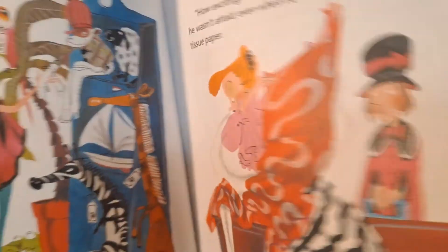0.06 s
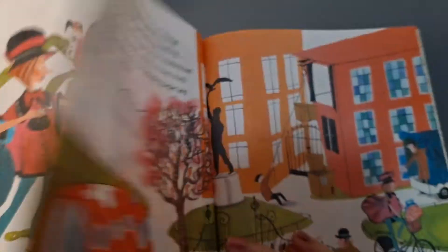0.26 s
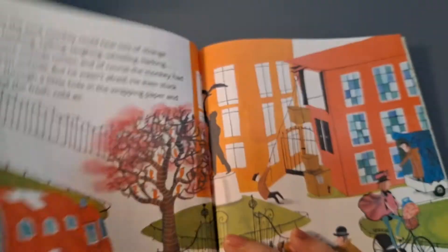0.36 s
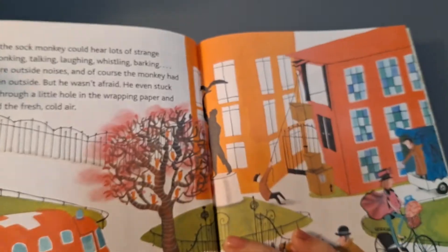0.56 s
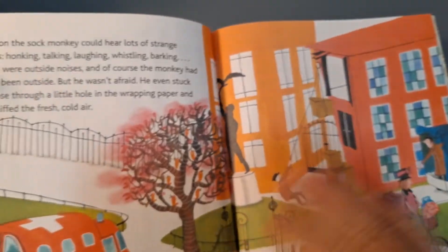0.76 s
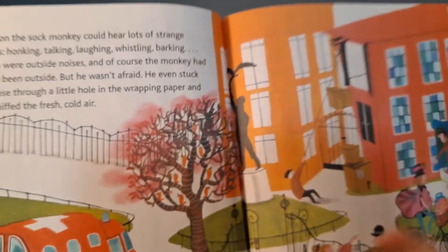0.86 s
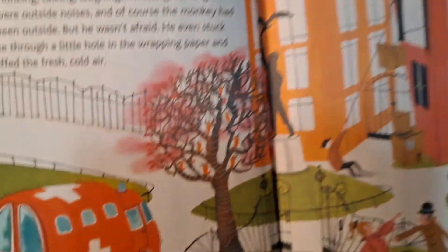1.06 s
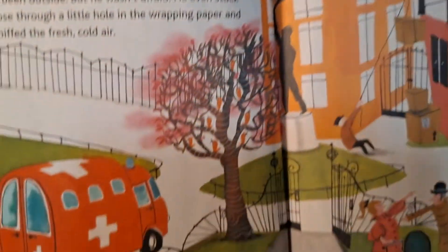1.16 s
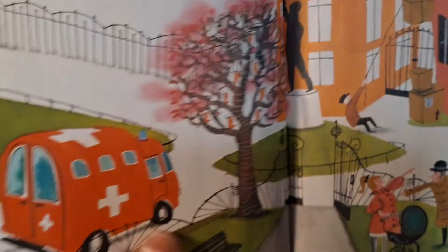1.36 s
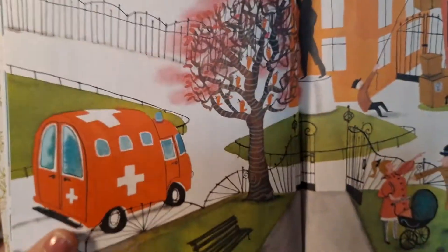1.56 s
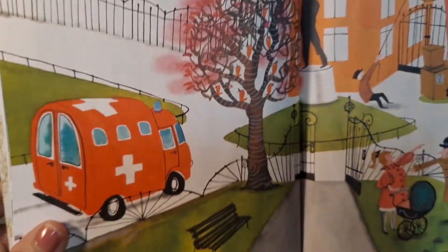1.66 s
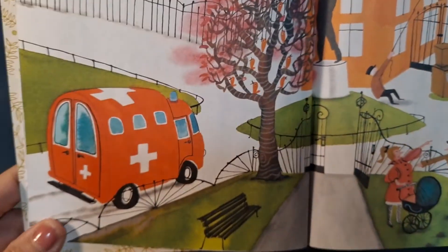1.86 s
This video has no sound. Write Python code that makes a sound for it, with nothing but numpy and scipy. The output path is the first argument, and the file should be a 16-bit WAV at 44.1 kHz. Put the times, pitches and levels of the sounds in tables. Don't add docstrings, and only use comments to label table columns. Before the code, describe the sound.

A stiff glossy book page is turned close to a hand-held stereo microphone in a quiet room. Light crackle and sliding from 0 s, a sharp loud snap with a low knock at 0.23 s, rustling settle until 0.45 s. Soft pats at 0.63 and 0.75 s, faint rubbing, a longer smoothing stroke from 1.2 to 1.55 s, a short one near 1.7 s, thin thumb hiss, low handling rumble.

```python
import sys
import numpy as np
from scipy import signal
from scipy.fft import rfft, irfft, next_fast_len
from scipy.io import wavfile

SR = 44100
rng = np.random.default_rng(int(sys.argv[2]) if len(sys.argv) > 2 else 0)


def inscribe(sig):
    pcm = np.round(np.clip(np.atleast_2d(sig).T, -1, 1) * 32767)
    wavfile.write(sys.argv[1], SR, pcm.astype(np.int16))


def level_to_linear(level):
    exponent = np.asarray(level, float) / 20
    return 10 ** exponent


N = 83790


def rms_one(x):
    return x / np.sqrt(np.mean(x ** 2) + 1e-20)


def at_hz(curve, hz):
    curve_hz, values = np.array(curve).T
    return np.interp(np.log(hz), np.log(curve_hz), values)


def in_time(rows):
    s, *columns = np.transpose(rows)
    return [np.interp(np.arange(N) / SR, s, column) for column in columns]


def drift(rate_hz):
    r = np.exp(-80 * np.pi * rate_hz / SR)
    slow = signal.lfilter([1], [1, -2 * r, r * r], rng.standard_normal(N // 40 + 2002))[2000:]
    return np.interp(np.arange(N) / 40, np.arange(len(slow)), rms_one(slow))


def ring(clicks, hz, t60_s):
    r = level_to_linear(-60 / (t60_s * SR))
    w = 2 * np.pi * hz / SR
    return signal.lfilter([0, np.sin(w)], [1, -2 * r * np.cos(w), r * r], clicks + 1e-18)


def bands(spectrum):
    edges = 22 * 2 ** np.arange(0, 9.7, .4)
    found = []
    for low, high in zip(edges, edges[1:]):
        centre = np.sqrt(low * high)
        if spectrum[0][0] < centre < spectrum[-1][0] * 1.1:
            found.append((signal.butter(2, [low, high], "band", fs=SR, output="sos"), centre))
    return found


def banded_noise(spectrum, patchy_db, rate_hz):
    # f/Hz, likeness [-1..1]
    likeness = [(60, 0.44), (300, 0.08), (3000, 0.5), (8000, 0.55), (15000, 0.17)]
    out, together = 0, drift(rate_hz)
    white = rng.standard_normal((2, 2, N + 8000))
    for k, (sos, hz) in enumerate(bands(spectrum)):
        mid, side = signal.sosfilt(sos, white[k % 2])[:, 8000:]
        alike = np.clip(at_hz(likeness, hz), -1, 1)
        stereo = np.sqrt(1 + alike) * mid + np.sqrt(1 - alike) * side * [[1], [-1]]
        flicker_db = patchy_db * (0.67 * together + drift(rate_hz))
        out = out + level_to_linear(at_hz(spectrum, hz) + flicker_db) * stereo
    return rms_one(out)


def grip_rumble():
    # f/Hz, level/dB per Hz
    rumble_colour = [(26, -25.5), (45, -4), (65, -3), (108, -13), (145, -25.5), (400, -36.5), (520, -67.5),
                     (880, -120)]
    # t/s, level/dB
    unrest = [(0, -61), (.13, -55), (.3, -60), (.5, -66.5), (.75, -65), (.86, -56), (.97, -63), (1.12, -68),
              (1.22, -52), (1.33, -59.5), (1.42, -59), (1.55, -60.5), (1.9, -64.5)]
    return level_to_linear(1 + in_time(unrest)[0]) * banded_noise(rumble_colour, patchy_db=2.0, rate_hz=9.1)


def noise_floor():
    # f/Hz, level/dB per Hz
    floor_colour = [(120, -22.5), (190, -2), (320, -12.5), (800, -15.5), (1370, -20.5), (1900, -29.5),
                    (4000, -32.5), (16000, -35)]
    return level_to_linear(-76.5) * banded_noise(floor_colour, patchy_db=-0.87, rate_hz=6.6)


def gestures():
    # t/s, slide level/dB, bend level/dB
    lift = [
        (0, -49.5, -62.5),
        (.02, -61.5, -63),
        (.05, -51.5, -47.5),
        (.15, -56, -52.5),
        (.21, -46.5, -50),
        (.213, -50, -36.5),
        (.229, -50.5, -39.5),
    ]
    # t/s, slide level/dB, bend level/dB
    fall = [(0.235, -40, -29), (0.25, -38.5, -29), (0.26, -41.5, -36), (0.324, -42, -51),
            (0.362, -43.5, -42), (0.369, -36.5, -36.5), (0.387, -39, -34.5), (0.402, -44, -37),
            (0.449, -69.5, -70.5), (.5, -78.5, -75), (0.559, -88.5, -89.5)]
    # t/s, slide level/dB, bend level/dB
    pats = [
        [(.58, -88.5, -92), (.608, -73, -90), (.626, -61, -71)],
        [(.631, -56.5, -47), (.665, -71.5, -63), (.716, -75.5, -68), (.746, -57.5, -76)],
        [(.753, -52, -53.5), (.8, -53, -53.5), (.835, -70, -62.5), (.853, -74, -57.5)],
    ]
    # t/s, slide level/dB, bend level/dB
    smoothing = [
        [(.857, -49, -59), (.882, -55.5, -64), (.9, -70, -60), (.93, -68.5, -57.5), (.994, -75, -74),
         (1.1, -71.5, -94)],
        [(1.14, -72, -74), (1.165, -62.5, -53.5), (1.22, -55, -60), (1.3, -45, -54), (1.4, -42.5, -55),
         (1.51, -42.5, -50.5), (1.59, -57, -68)],
        [(1.67, -56.5, -64), (1.712, -46, -52.5), (1.75, -55, -67.5), (1.9, -66, -70)],
    ]
    return in_time(sorted(lift + fall + sum(pats + smoothing, [])))


def slide(speed_db):
    # f/Hz, level/dB per Hz
    hiss_colour = [(880, -38.5), (1500, -13), (2510, -4), (2740, -6.5), (4120, -8), (9370, -2),
                   (10900, -6.5), (15100, -1), (16000, -2)]
    # t/s, share of tips [-1..1]
    tip_share = [(0, 0.565), (.22, 0.185), (.25, 1), (.42, .5), (.6, .3), (.8, -0.456), (1.14, -0.38),
                 (1.24, 1), (1.33, 0.39), (1.52, 0.095), (1.6, 1), (1.9, .9)]
    hiss = banded_noise(hiss_colour, patchy_db=0.88, rate_hz=55)
    dull = signal.sosfilt(signal.butter(1, 10000, fs=SR, output="sos"), hiss)
    tips = np.clip(in_time(tip_share)[0], -1, 1)
    return level_to_linear(speed_db + 2.5) * ((1 - tips) * hiss + tips * dull)


def crackle(spectrum, per_s, cycles):
    spread_db, ear_scatter_db, pitch_count = 1.9136, 5, 22
    sizes = level_to_linear(spread_db * np.minimum(rng.exponential(1, N), 5)) * rng.choice([-1, 1], N)
    sizes = sizes * level_to_linear(ear_scatter_db * rng.standard_normal(N) * [[1], [-1]])
    born = rng.random(N) < per_s * level_to_linear(3 * drift(40)) / SR
    pitches = np.geomspace(spectrum[1][0], spectrum[-3][0], num=pitch_count)
    dealt = rng.integers(0, pitch_count, size=N)
    rings = 0
    for k, hz in enumerate(pitches):
        grains = sizes * born * (dealt == k)
        rings = rings + level_to_linear(at_hz(spectrum, hz)) * hz * ring(grains, hz, cycles / hz)
    return rms_one(signal.sosfilt(signal.butter(2, 408, "high", fs=SR, output="sos"), rings))


def bending_crackle():
    # f/Hz, level/dB per Hz
    bend_colour = [(180, -46), (300, -11), (647, -7.5), (796, -9.5), (1230, -1), (1460, -9.5), (2230, -6),
                   (2900, -7.5), (8000, -19), (10400, -44), (17600, -120)]
    return level_to_linear(1) * crackle(bend_colour, per_s=8000, cycles=13)


def room(x):
    t60_s, wall_cut_hz = 0.19, 7100
    size = next_fast_len(N + SR)
    bins = np.arange(size // 2 + 1)
    turn = np.exp(-2j * np.pi * bins / size)
    dull = np.exp(-2 * np.pi * wall_cut_hz / SR)
    wall = (1 - dull) / (1 - dull * turn)
    out = np.zeros((2, len(bins)), complex)
    for k, lag in enumerate((rng.uniform(0.0045, .022, size=16) * SR).astype(int)):
        loop = level_to_linear(-60 * lag / SR / t60_s) * wall * np.exp(-2j * np.pi * lag * bins / size)
        out[k % 2] += loop / (1 - loop) * (-1) ** (k // 2)
    return irfft(out * rfft(x, size), size)[:, :N]


def knocks():
    # t/s, peak level/dB, f/Hz, t60/s
    contacts = [(0.226, -36, 105, 0.119), (0.273, -40, 106, 0.112), (0.0358, -46.5, 320, 0.135),
                (0.688, -44.5, 200.3, 0.0543), (0.641, -35.5, 400, 0.0153), (0.652, -37.5, 190, 0.028),
                (0.6555, -41.5, 97.6, 0.1155), (0.768, -47.5, 190, 0.0754), (1.134, -45, 112, 0.139),
                (1.266, -38, 118, 0.0588), (1.252, -46.5, 110, 0.069), (0.325, -40.5, 170, 0.0331),
                (.2335, -37, 260, .05), (0.37, -46, 230, .06), (0.00402, -53, 327, 0.061),
                (0.085, -50.5, 200, 0.059), (0.6, -49, 343, 0.054), (.782, -48.5, 150, 0.079),
                (0.352, -46, 95, 0.0973), (1.561, -52, 430, 0.036), (1.618, -42.5, 460, .035),
                (1.628, -52, 330, 0.072), (1.65, -54.5, 200, 0.0935), (1.85, -56.5, 55, 0.277)]
    out = np.zeros(N)
    for s, db, hz, t60_s in contacts:
        push = np.zeros(N)
        push[int(s * SR)] = level_to_linear(db)
        out += ring(push, hz, t60_s)
    return signal.sosfilt(signal.butter(2, 600, fs=SR, output="sos"), out)


def snaps():
    # t/s, peak level/dB, ring f/Hz, length/s, share of broad crack [0..1]
    buckles = [(0.028, -33.5, 841, 0.007, 0.13), (0.062, -40, 3450, 0.00272, 1),
               (0.109, -32.5, 1181, 0.003, 0.0678), (0.2139, -20, 1828, 0.0041, 0.261),
               (0.22, -26.5, 1787, 0.002685, 0.22), (.385, -22, 2237, 0.0047, 0.167),
               (.582, -58.5, 6943, .002, .5), (0.614, -54, 6000, .006, .3),
               (0.76, -37.5, 2119, .006, 0.115), (0.769, -38.5, 3164, .006, 0.154),
               (1.118, -61, 2053, .008, 0.253), (1.151, -50, 1928, .006, .3),
               (1.176, -44, 600, 0.00078, 0.367), (1.227, -40, 1250, 0.00389, .3),
               (1.271, -48.5, 1376, 0.0033, .1), (0.239, -13, 1900, 0.0039, 0.61),
               (0.2305, -4.5, 3104, 0.003543, 0.497), (0.232, -5.5, 4540, 0.00357, 0.505),
               (0.24, -12.5, 4430, 0.0043, 1), (0.2449, -19, 2840, .006, 0.18),
               (.3425, -25, 643, 0.0028, .7), (0.362, -33.5, 1116, 0.0069, 0.4),
               (1.179, -50.5, 2190, 0.012, .1), (0.392, -23.5, 1227, .004, 0.12),
               (.629, -30.5, 2470, 0.00071, 0.67), (0.7504, -29.5, 613.8, 0.002553, 0.283),
               (.751, -35, 2590, 0.00309, 0.15), (0.76, -43.5, 845, 0.00584, 0.103),
               (0.91, -40, 893, 0.008, 0.132), (0.914, -39, 1355, 0.01358, .1),
               (0.927, -38.5, 1000, 0.0077, 0.12), (1.162, -42, 1941, 0.003026, 0.295),
               (1.2345, -33, 1197, 0.00207, 0.48), (0.2329, -10, 1862, .0025, 0.102)]
    # f/Hz, level/dB per Hz
    crack_colour = [(120, -62.5), (200, -40.5), (548, -24), (1150, -5), (1590, -13), (1910, -7.5),
                    (3100, -6), (6000, -10), (14300, -35.5), (16000, -76.5)]
    clicks_each, ring_cycles, ear_scatter_db = 20, 21, 6
    clicks = np.full((len(buckles), 2, 2048), 1e-18)
    chance = rng.random((len(buckles), 3, clicks_each))
    for volley, buckle, (when, size, side) in zip(clicks, buckles, chance):
        late = np.sort(when) - when.min()
        force = np.where(late > 0, 2 * size - 1, .8) * np.exp(-2.1 * late)
        places = (2 * late * buckle[3] * SR).astype(int)
        for ear, sign in enumerate((1, -1)):
            np.add.at(volley[ear], places, force * level_to_linear(sign * ear_scatter_db * (2 * side - 1)))
    cracks = 0
    for k, (sos, centre) in enumerate(bands(crack_colour)):
        cracks = cracks + level_to_linear(at_hz(crack_colour, centre)) * signal.sosfilt(sos, clicks) * (-1) ** k
    out = np.zeros((2, N + SR))
    for (s, db, hz, _, share), volley, crack in zip(buckles, clicks, cracks):
        tone = ring(volley, hz, ring_cycles / hz)
        share = np.clip(share, 0, 1)
        both = share * crack / abs(crack).max() + (1 - share) * tone / abs(tone).max()
        start = int(s * SR)
        out[:, start:start + both.shape[1]] += level_to_linear(db) * both / abs(both).max()
    return out[:, :N]


def air_pocket():
    # t/s, f/Hz, level/dB re bending effort
    gap = [(.75, 1418, -30.5), (.8, 1419, -5), (.88, 1400, -2), (.93, 1261, -4.5), (1.0, 1101, 0),
           (1.06, 1150, 1), (1.15, 1251, -13), (1.27, 1379, -2), (1.36, 1257, -3), (1.5, 1063, -5),
           (1.6, 1033, -5.5), (1.69, 1200, -3.5), (1.75, 1241, -0.5), (1.9, 1148, -7)]
    width_hz = 132.4
    hz, db = in_time(gap)
    noise = rng.standard_normal((3, 2, N))
    mixed = noise[0] + .6 * noise[1:]
    slow = signal.sosfilt(signal.butter(2, width_hz / 2, fs=SR, output="sos"), mixed)
    turn = 2 * np.pi * np.cumsum(hz) / SR
    return level_to_linear(db) * rms_one(slow[:, 0] * np.cos(turn) + slow[:, 1] * np.sin(turn))


def rubbing():
    # f/Hz, level/dB per Hz
    rub_colour = [(250, -45), (420, -15), (750, -15.5), (1000, -2.5), (1300, -2.5), (1650, -12),
                  (2400, -10), (3600, -14.5), (4680, -40), (7920, -120)]
    return level_to_linear(-4) * crackle(rub_colour, per_s=6000, cycles=20.1)


def thumb():
    # t/s, level/dB
    creep = [
        (1.42, -97),
        (1.57, -65.5),
        (1.9, -69),
    ]
    hiss = ring(rng.standard_normal((2, N)), hz=9350, t60_s=0.0028)
    return level_to_linear(in_time(creep)[0]) * rms_one(hiss)


def scene():
    turn_ends_s = .79
    slide_db, bend_db = gestures()
    in_the_air = np.arange(N) / SR < turn_ends_s
    grain = np.where(in_the_air, bending_crackle(), rubbing())
    sheet = level_to_linear(bend_db) * (grain + air_pocket()) + snaps()
    echoes = level_to_linear(-19.5) * room(sheet.mean(axis=0))
    return grip_rumble() + noise_floor() + slide(slide_db) + sheet + echoes + knocks() + thumb()


def band_limit(x):
    return signal.sosfilt(signal.butter(12, 16890, fs=SR, output="sos"), x)


def record(dry):
    # f/Hz, left lead/rad
    port_lead = [(40, 1.3), (125, 1.5), (300, 2.2), (600, 2.1), (1200, 1.55), (2500, 1.2), (5000, .8),
                 (10000, 1.4)]
    # f/Hz, left minus right level/dB
    port_balance = [(70, -9.5), (180, -5.5), (700, 0.68), (1500, 1.82), (5000, 3), (14000, 2.5)]
    # f/Hz, level/dB
    port_colour = [(100, 4.5), (8300, 0.0741), (9400, 3), (10000, 2.5), (10700, -2.5), (12000, 0.75),
                   (15300, 2), (16000, -2)]
    low_cut_hz, top_hz = 55, 16000
    size = next_fast_len(N + SR // 4)
    hz = np.arange(1, size // 2 + 2) * SR / size
    half = level_to_linear(at_hz(port_balance, hz) / 2) * np.exp(.5j * at_hz(port_lead, hz))
    colour = level_to_linear(at_hz(port_colour, hz))
    colour = colour / np.sqrt(1 + (low_cut_hz / hz) ** 8) / np.sqrt(1 + (hz / top_hz) ** 400)
    ports = colour * np.array([half, 1 / half])
    mix = irfft(rfft(dry, size) * ports, size)[:, :N]
    return band_limit(mix)


dry = scene()
out = record(dry)
inscribe(out)
```